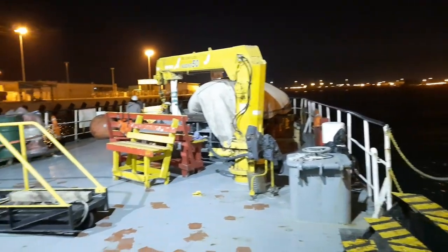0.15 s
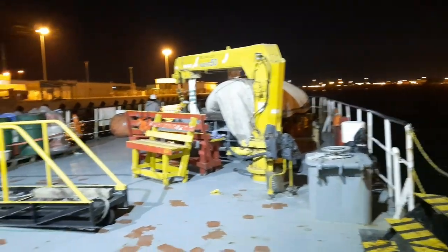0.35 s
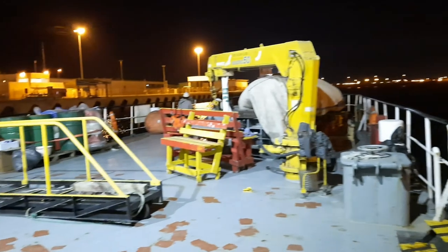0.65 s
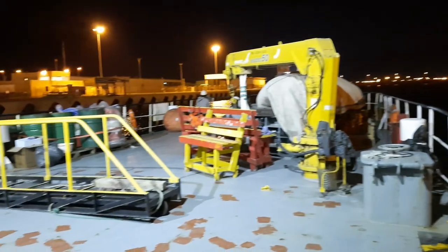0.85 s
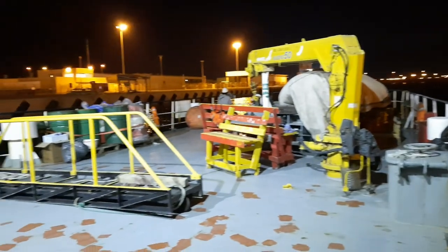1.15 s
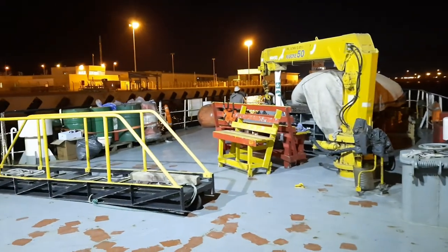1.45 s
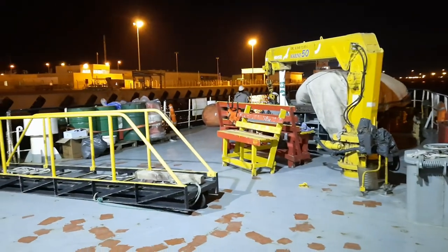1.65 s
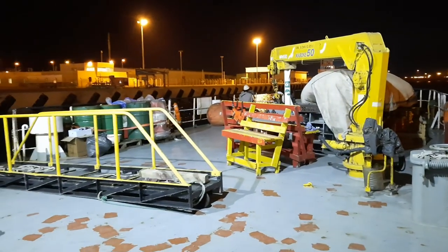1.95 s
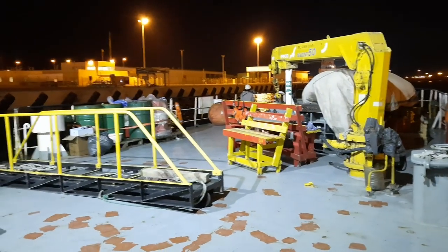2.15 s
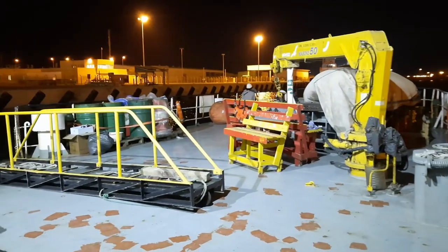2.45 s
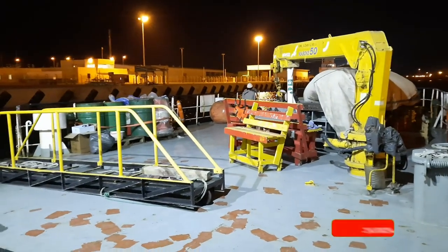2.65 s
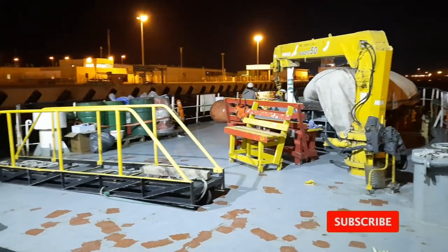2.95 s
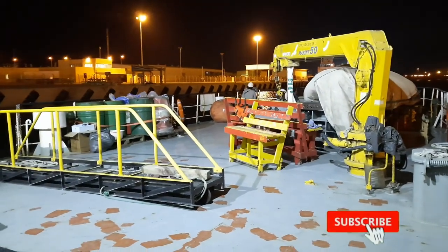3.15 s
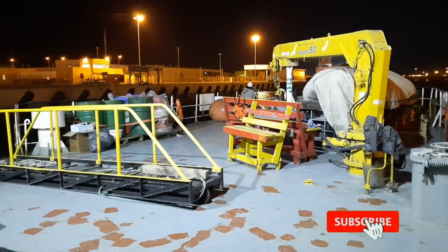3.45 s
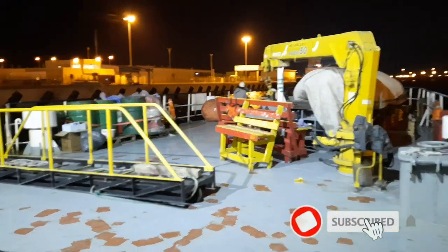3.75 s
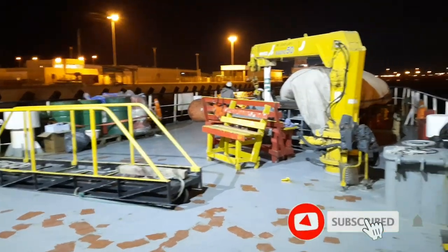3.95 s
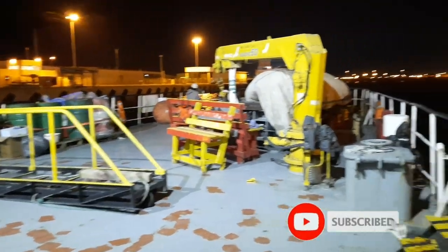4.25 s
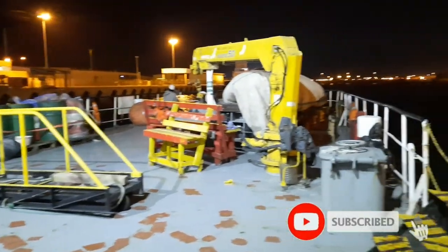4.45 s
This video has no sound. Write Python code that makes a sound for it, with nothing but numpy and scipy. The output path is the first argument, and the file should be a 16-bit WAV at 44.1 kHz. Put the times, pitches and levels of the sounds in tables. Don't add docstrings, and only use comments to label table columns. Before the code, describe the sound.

Steady machinery drone heard outdoors through a hand-held stereo device: a deep, slowly beating engine note, mid-low exhaust roar with fluttering firings, and a low fan hum. Over it lie thin motor whines and a soft rush of air with whistly pulses. After a brief opening puff the bed stays unbroken, growing slightly louder and airier towards the end, then cuts off.

```python
import sys
import numpy as np
from scipy import signal
from scipy.fft import rfft, irfft, next_fast_len
from scipy.io import wavfile
from scipy.ndimage import uniform_filter1d, map_coordinates

SR = 44100
rng = np.random.default_rng(int(sys.argv[2]) if len(sys.argv) > 2 else 0)


def store_pcm(level_fs):
    pcm = np.round(np.clip(level_fs, -1, 1) * 32767).astype(np.int16)
    wavfile.write(sys.argv[1], SR, np.atleast_2d(pcm).T)


def gain_from_db(level_db):
    decades = np.asarray(level_db, float) / 20
    return 10 ** decades


N = 203036
T = np.arange(N) / SR
SIDES = np.array([[.5], [-.5]])
DUCK_DB = -6

# t/s, level/dB over mean
LOAD = [(0, -3), (.05, 2), (.13, -1.5), (.3, -2.5), (.6, -2), (1.0, -3), (1.3, -1), (1.8, -2), (2.2, 0),
        (2.45, -3), (2.75, -1.5), (3.2, 0.5), (3.9, -1), (4.4, -0.5), (4.6, 1)]


def exhaust():
    load_db, = curves(LOAD)
    chug = wobble(13)
    knock_db = uniform_filter1d(knocks(), size=90)
    gas = funnel(load_db, chug) + silencer(load_db, chug, knock_db) + casing(load_db, knock_db)
    return gas + casing_rings() + low_note()


# f/Hz, level/dB per Hz
FUNNEL_SPECTRUM = [(8, -21), (25, -21.5), (38, -13.5), (50, -4.5), (62, 0), (75, -4), (105, -5), (135, 2),
                   (160, -1.5), (195, -2), (240, -26), (300, -120)]
# t/s, level/dB, f/Hz, half length/s
THUDS = [(0.052, -20, 92, 0.005), (0.12, -22, 117, 0.004), (0.215, -19, 112, 0.005),
         (0.261, -20, 127, 0.005), (0.522, -15, 105, 0.005), (0.601, -22, 91, 0.012),
         (0.699, -22, 92, 0.006), (0.846, -21, 110, 0.005), (1.018, -18, 89, 0.007),
         (1.097, -21, 100, 0.004), (1.206, -20, 88, 0.007), (1.394, -17, 119, 0.005),
         (1.488, -20, 107, 0.004), (1.586, -18, 91, 0.005), (1.671, -19, 101, 0.004),
         (1.718, -22, 109, 0.003), (1.779, -17, 101, 0.006), (1.856, -19, 100, 0.005),
         (1.947, -18, 99, 0.004), (2.002, -17, 102, 0.005), (2.114, -18, 98, 0.005),
         (2.258, -20, 104, 0.004), (2.361, -20, 92, 0.005), (2.475, -20, 100, 0.005),
         (2.586, -19, 104, 0.005), (2.683, -19, 105, 0.005), (2.786, -22, 86, 0.006),
         (2.9, -21, 102, 0.005), (3.027, -19, 93, 0.008), (3.089, -19, 98, 0.005), (3.175, -18, 91, 0.007),
         (3.248, -22, 105, 0.004), (3.298, -17, 105, 0.005), (3.358, -19, 108, 0.004),
         (3.409, -22, 93, 0.007), (3.557, -20, 100, 0.005), (3.767, -19, 95, 0.006),
         (3.835, -19, 95, 0.006), (3.912, -19, 111, 0.006), (3.973, -19, 100, 0.006),
         (4.034, -20, 100, 0.005), (4.089, -21, 115, 0.005), (4.152, -21, 81, 0.009),
         (4.225, -22, 117, 0.005), (4.374, -22, 85, 0.011), (4.477, -22, 91, 0.004),
         (4.53, -20, 113, 0.005), (4.592, -17, 93, 0.005)]
# t/s, level/dB, f/Hz, half length/s
GRUNTS = [(0.111, -23, 142, 0.01), (0.268, -26, 152, 0.012), (0.521, -22, 147, 0.007),
          (1.26, -24.5, 142, 0.0074), (1.393, -31, 137.5, 0.01), (1.671, -30, 140, 0.0052),
          (1.813, -20.5, 138, 0.0055), (1.985, -26, 142, 0.018), (2.114, -25, 143, 0.009),
          (2.248, -28.5, 146, 0.0077), (2.587, -26, 144, 0.0046), (3.355, -20, 150, 0.007),
          (3.672, -21.5, 145, 0.0083), (4.583, -19, 143, 0.006)]


def funnel(load_db, chug):
    level_db = -25 + 0.093 * load_db + 0.47 * chug + 1.1 * wobble(32)
    level_db += ducked(THUDS) + .5 * ducked(GRUNTS)
    gas = gain_from_db(level_db) * rush(shaped(FUNNEL_SPECTRUM), patchy_db=-0.16)
    return gas + bursts(THUDS, share_db=-1) + bursts(GRUNTS, share_db=-1)


# f/Hz, level/dB per Hz
SILENCER_SPECTRUM = [(150, -120), (190, -16), (225, -10), (270, -5), (305, -2), (345, -8), (390, -5),
                     (440, -7), (500, -7), (550, -10), (600, -25.5), (750, -120)]
# t/s, level/dB, f/Hz, half length/s
BOOMS = [(0.046, -11.5, 330, 0.0038), (0.277, -18, 312, 0.0049), (0.43, -17.5, 330, 0.0044),
         (0.565, -15, 317, 0.0036), (0.673, -16.5, 315, 0.0062), (0.752, -19.5, 302, 0.0061),
         (0.832, -19, 337, 0.0084), (1.055, -18, 347, 0.013), (1.157, -18, 327, 0.0088),
         (1.228, -19, 340, 0.0032), (1.28, -16, 354, 0.0058), (1.378, -18.5, 329, 0.007),
         (1.488, -15, 318, 0.0032), (1.545, -18.5, 330, 0.004), (1.595, -16, 336, 0.0037),
         (1.824, -11.5, 322, 0.0016), (1.903, -19, 313, 0.0051), (1.97, -20, 327, 0.0033),
         (2.098, -24, 326, 0.02), (2.232, -14, 306, 0.0051), (2.314, -22, 325, 0.0039),
         (2.463, -20, 309, 0.009), (2.621, -18, 370, 0.0064), (2.74, -15, 362, 0.0035),
         (2.971, -23, 338, 0.014), (3.056, -16.5, 341, 0.0032), (3.132, -22, 311, 0.0092),
         (3.2, -18.5, 320, 0.013), (3.266, -19, 336, 0.0055), (3.347, -18, 358, 0.0031),
         (3.405, -19, 350, 0.004), (3.47, -22, 305, 0.011), (3.526, -19, 294, 0.0076),
         (3.6, -18.5, 333, 0.0046), (3.671, -21.5, 301, 0.0088), (3.781, -15.5, 318, 0.006),
         (3.94, -19, 307, 0.017), (4.034, -29, 330, 0.015), (4.155, -18.5, 350, 0.0067),
         (4.212, -15, 330, 0.0027), (4.288, -23.5, 368, 0.008), (4.35, -22, 320, 0.0044),
         (4.418, -16.5, 320, 0.0075), (4.506, -29, 336, 0.0035), (4.563, -16.5, 335, 0.0046)]
# t/s, level/dB, f/Hz, half length/s
PINGS = [(0.059, -22, 499, 0.004), (0.139, -24, 487, 0.004), (0.434, -23, 499, 0.009),
         (0.548, -22, 500, 0.005), (0.695, -23, 471, 0.004), (0.845, -21, 485, 0.004),
         (1.161, -22, 460, 0.005), (1.253, -23, 481, 0.005), (1.377, -23, 459, 0.01),
         (1.505, -23, 498, 0.006), (1.651, -23, 476, 0.004), (1.735, -22, 494, 0.004),
         (1.792, -23, 471, 0.004), (1.877, -24, 506, 0.005), (2.076, -20, 492, 0.004),
         (2.226, -22, 477, 0.014), (2.289, -23, 478, 0.007), (2.467, -23, 498, 0.009),
         (2.557, -23, 496, 0.005), (2.666, -22, 483, 0.005), (2.752, -22, 479, 0.01),
         (2.985, -23, 496, 0.004), (3.053, -22, 469, 0.007), (3.185, -21, 465, 0.005),
         (3.421, -23, 483, 0.007), (3.619, -22, 464, 0.004), (3.716, -23, 471, 0.007),
         (3.791, -24, 465, 0.004), (3.843, -21, 483, 0.004), (3.92, -22, 496, 0.009),
         (4.076, -20, 475, 0.007), (4.282, -22, 481, 0.008), (4.341, -23, 479, 0.008),
         (4.398, -22, 472, 0.005), (4.487, -22, 492, 0.008), (4.537, -22, 492, 0.009)]


def silencer(load_db, chug, knock_db):
    level_db = -20.5 + load_db + 0.24 * wobble(24) + 0.81 * chug + knock_db
    level_db += ducked(BOOMS) + .5 * ducked(PINGS)
    gas = gain_from_db(level_db) * rush(shaped(SILENCER_SPECTRUM), patchy_db=0.18)
    return gas + bursts(BOOMS, share_db=-2) + bursts(PINGS, share_db=-2)


# f/Hz, level/dB per Hz
CASING_SPECTRUM = [(450, -120), (540, -5.5), (600, -1.5), (700, -2), (830, -1.5), (930, -7), (1000, -11.5),
                   (1150, -13.5), (1300, -15), (1450, -30), (1700, -120)]


def casing(load_db, knock_db):
    level_db = -30 + 0.88 * load_db + 1.1 * wobble(20) + knock_db
    return gain_from_db(level_db) * rush(shaped(CASING_SPECTRUM), patchy_db=1.0)


# t/s, level/dB over steady noise
KNOCKS = [(0.229, 7), (0.425, 8), (.841, 6), (1.054, 6), (1.137, 8), (1.277, 8), (1.381, 5), (1.632, 8),
          (2.012, 7), (2.341, 8), (2.451, 6), (3.511, 8), (4.027, 7), (4.126, 6)]


def knocks():
    dip_s, fade_s = .006, .012
    level_db = np.zeros(N)
    for s, db in KNOCKS:
        gap_s = abs(T - s)
        level_db += db * np.where(T < s, -np.exp(-gap_s / dip_s), np.exp(-gap_s / fade_s))
    return level_db


def casing_rings():
    ring_hz, ring_db, t60_s = 560, -30, .05
    out, t = np.zeros(N + SR), np.arange(SR // 10) / SR
    for s, db in KNOCKS:
        ring = gain_from_db(db + ring_db - 60 * t / t60_s) * np.sin(2 * np.pi * ring_hz * t)
        out[round(s * SR):][:len(t)] += ring
    return out[:N]


# t/s, level/dB over trough, half length/s
BEATS = [
    (0, 5.1, 0.091),
    (.56, 7.8, 0.025),
    (1.15, 13, 0.17),
    (1.9, 14, 0.17),
    (2.57, 9.3, 0.15),
    (3.13, 15, 0.12),
    (3.78, 6, 0.089),
    (4.05, 15.5, 0.16),
    (4.6, 14, 0.12),
]


def low_note():
    note_hz = 88.5 + 1.24 * wobble(4.94)
    level_db = -40 + ducked(THUDS) + swells(BEATS) + 4 * wobble(18)
    return tone(note_hz, level_db, pan_db=-0.5, lead=.1)


# multiple, level/dB, left-right/dB, left lead/rad
BLADES = [(2, -32.5, 2.5, .6), (13, -64.5, 2, -.6), (14, -67, 0, 2), (15, -68, 1, 1.5), (18, -74, -1, -.5),
          (19, -71, 0, 2.3), (21, -75, 0, -.8)]
# t/s, level/dB over lull, half length/s
CARRY = [(.2, 2, 0.052), (.55, -2, .2), (.95, 4, 0.084), (1.15, 3, 0.17), (1.4, 3, 0.077), (1.62, 3, 0.022),
         (1.8, 5.5, 0.073), (2.08, 6, 0.097), (2.24, 9.5, 0.016), (2.34, -7.5, 0.067), (2.5, 3, 0.026),
         (2.73, -6.5, 0.085), (3.03, 4, 0.023), (3.23, 1, 0.017), (3.45, 8.5, 0.047), (3.65, 5.5, 0.07),
         (3.88, 5, 0.062), (4.06, 7, 0.028), (4.29, 5.5, 0.04), (4.44, 4.5, 0.029), (4.6, -8, 0.043)]
# t/s, level/dB, half length/s
SECOND = [
    (.2, 0, 0.069),
    (1.3, -0.5, 0.28),
    (1.72, -9.5, 0.047),
    (1.9, 6.5, 0.066),
    (2.35, 4, 0.093),
    (2.9, -4, 0.062),
    (3.22, -7, 0.05),
    (3.5, 1, .2),
    (4.3, 4.5, .08),
]


def fan():
    blade_hz = 177.7 + 0.034 * wobble(1.8)
    blade_db = -29 + swells(CARRY) + 2.2 * wobble(24)
    out = tone(blade_hz + 1.2 * wobble(30), blade_db, pan_db=0.5, lead=.12)
    siren_db = -59.5 + 0.77 * T + .3 * wobble(1.6) + 2.0 * wobble(14)
    siren_db += swells([(.1, -3.5, .3)])
    out += tone(17 * blade_hz + 1.5 * wobble(25), siren_db, pan_db=2.5, lead=-.9)
    second_db = swells(SECOND)
    for multiple, db, pan_db, lead in BLADES:
        level_db = db + (multiple < 3) * second_db + 3.5 * wobble(23.9)
        out += tone(multiple * blade_hz + 2.92 * wobble(30.06), level_db, pan_db, lead)
    return out


# f/Hz, level/dB, wander/Hz, left-right/dB, left lead/rad
WHINES = [(1188.4, -54.5, .8, 3, .6), (1441, -63, 2.5, 1, -2.2), (1424, -57, 2.5, 0, -2.4),
          (798, -48, 4, 1, .3), (950.7, -54, .8, 0, 2.6), (1931.2, -55, .5, 0, -2.8),
          (1961, -60, .8, 0, -2.7), (2130, -62, 4, 0, -2.2)]


def pumps():
    out = tone(468.5 + 0.65 * wobble(3.92), -36.5 + 2.97 * wobble(16), pan_db=-1.0, lead=0.27)
    for whine_hz, db, wander_hz, pan_db, lead in WHINES:
        out += tone(whine_hz + wander_hz * wobble(3.3), db + 4.0 * wobble(7.3), pan_db, lead)
    return out


# t/s, half length/s, f/Hz,
# level/dB, left lead/rad
SQUEALS = [
    (2.93, .19, 1443, -50, -1.6),
    (1.35, .38, 2843.5, -58, 1.6),
    (3.5, .45, 2843.5, -62, 1.6),
    (3.8, .1, 1425, -54, -1.6),
    (4.45, .12, 1480, -55, -1.6),
]


def squeals():
    out = np.zeros((2, N))
    for s, half_s, hz, db, lead in SQUEALS:
        shape = np.exp(-.5 * ((T - s) / half_s) ** 4)
        out += shape * tone(hz + 2.6 * wobble(7.1), db + 1.9 * wobble(10), 0.68, lead)
    return out


# t/s, level/dB over steady draught
STROKES = [(.05, 7), (.4, 7), (.62, 8), (.85, 4), (1.02, 5), (1.2, 4), (1.42, 4), (1.64, 10), (2.0, 6),
           (2.37, 9), (2.76, 3), (3.1, 5), (3.45, 6), (3.83, 13), (4.13, 8), (4.4, 8), (4.54, 13)]


def vent():
    push_db = swells(STROKES, half_s=0.057)
    return draught(push_db) + whistle(push_db) + grille() + puff()


# f/Hz, level/dB per Hz
RUSH = [(1100, -120), (1250, -21.5), (1400, 1.5), (1700, 3.5), (1850, -2), (2250, -5.5), (2520, -10.5),
        (2800, -10), (3150, -14), (3650, -12), (4000, -16.5), (4600, -24), (5500, -121)]
# f/Hz, level/dB per Hz
HISS = [(3400, -121), (4000, -11), (4500, 0.5), (5300, -1.5), (6000, -2), (7500, -7), (8600, -13.5),
        (9400, -21.5), (10200, -19), (11000, -17.5), (12000, -19.5), (12900, -18.5), (14300, -22.5),
        (15100, -33), (15600, -121)]


def draught(push_db):
    gust, draught_db = wobble(9.9), .5 * T
    rush_db = -41.5 + draught_db + 0.099 * push_db + 0.12 * gust
    hiss_db = -57.5 + draught_db + 0.11 * push_db + 0.69 * gust
    air = gain_from_db(rush_db) * rush(shaped(RUSH), patchy_db=1.65)
    return air + gain_from_db(hiss_db) * rush(shaped(HISS), patchy_db=-1.5)


# t/s, level/dB, f/Hz, half length/s
CHIRPS = [(0.047, -43, 1616, 0.008), (0.14, -44, 1608, 0.005), (0.386, -41, 1646, 0.007),
          (0.471, -43, 1639, 0.005), (0.573, -45, 1632, 0.006), (0.624, -38, 1640, 0.005),
          (0.761, -47, 1634, 0.008), (0.831, -43, 1602, 0.005), (1.017, -43, 1636, 0.007),
          (1.099, -46, 1665, 0.005), (1.201, -45, 1623, 0.007), (1.299, -47, 1638, 0.005),
          (1.408, -42, 1608, 0.005), (1.474, -45, 1618, 0.006), (1.562, -43, 1620, 0.005),
          (1.654, -41, 1613, 0.005), (1.87, -46, 1625, 0.004), (1.962, -43, 1583, 0.011),
          (2.053, -45, 1632, 0.005), (2.104, -46, 1613, 0.006), (2.226, -45, 1606, 0.004),
          (2.299, -44, 1632, 0.01), (2.358, -41, 1642, 0.005), (2.415, -42, 1615, 0.005),
          (2.527, -45, 1626, 0.005), (2.73, -43, 1644, 0.005), (2.796, -45, 1651, 0.007),
          (3.087, -43, 1634, 0.005), (3.162, -44, 1631, 0.005), (3.25, -46, 1604, 0.005),
          (3.351, -44, 1611, 0.006), (3.454, -42, 1639, 0.005), (3.767, -42, 1612, 0.004),
          (3.844, -40, 1620, 0.007), (3.911, -44, 1627, 0.005), (3.97, -46, 1618, 0.005),
          (4.071, -42, 1620, 0.005), (4.122, -40, 1620, 0.008), (4.191, -44, 1617, 0.007),
          (4.258, -45, 1616, 0.011), (4.35, -43, 1624, 0.006), (4.404, -45, 1666, 0.006),
          (4.466, -39, 1620, 0.008), (4.543, -39, 1641, 0.009), (4.597, -46, 1651, 0.004)]


def whistle(push_db):
    level_db = -49 + 0.45 * ducked(CHIRPS) + 0.75 * push_db + 0.98 * wobble(35)
    breath = gain_from_db(level_db) * rush(resonance(centre_hz=1630, width_hz=210), patchy_db=0.5)
    return breath + bursts(CHIRPS, share_db=-.5)


# t/s, level/dB over lull, half length/s
GUSTS = [
    (.42, 5, 0.06),
    (1.28, 5, .09),
    (1.6, 7, .1),
    (1.95, 5, 0.1),
    (2.25, 5, 0.12),
    (2.98, 6, 0.12),
    (3.5, 6, 0.12),
    (3.9, 7, 0.18),
]


def grille():
    return gain_from_db(-56 + swells(GUSTS)) * rush(resonance(centre_hz=2540, width_hz=420), patchy_db=3.0)


# f/Hz, level/dB per Hz
PUFF_SPECTRUM = [(1500, -121), (2500, 1), (5000, 3.5), (8300, -1.5), (9500, -19), (10600, -12),
                 (14000, -13.5), (15500, -18), (15700, -121)]


def puff():
    end_s, release_s, sag_db_per_s = .158, .008, 30
    gate = (1 - np.tanh((T - end_s) / release_s)) / 2
    return gain_from_db(-47 - sag_db_per_s * T) * gate * rush(shaped(PUFF_SPECTRUM), patchy_db=.8)


# f/Hz, likeness/0-1
ALIKE = [(25, .25), (60, .66), (110, .68), (250, .7), (500, .77), (800, .55), (1280, .15), (1600, .55),
         (1950, .65), (2400, .48), (3150, .1), (3700, .45), (4150, .12), (4800, .3), (6000, .12)]
# f/Hz, left lead/rad
LEAD = [(30, 0), (600, .35), (1200, .5), (1400, -2.7), (1700, -3.3), (2050, -3), (2350, -1.2), (3000, -.9),
        (3350, -1.5), (4000, -.2), (4400, 1.5), (5000, 3.1), (6000, 4.8)]
# f/Hz, left-right/dB
BALANCE_DB = [(60, -.4), (300, 1), (600, 1), (2000, 0), (6000, -1), (8000, -1), (8600, -5.5), (9800, 0),
              (11500, -.5), (13500, -6), (15000, -3)]


def rush(gain, patchy_db):
    z = signal.stft(rng.standard_normal((3, N + 1024)), nperseg=512)[2]
    field = uniform_filter1d(rng.standard_normal(z.shape[1:]), size=5, axis=0)
    field = uniform_filter1d(field, size=10, axis=1)
    noise = signal.istft(z * gain_from_db(patchy_db * unit(field)), nperseg=512)[1]
    m = next_fast_len(N + 8192)
    shared, *own = rfft(noise, m)
    hz = np.fft.rfftfreq(m, 1 / SR)
    alike = np.clip(along(ALIKE, hz), 0, 1)
    pair = np.sqrt(alike) * shared * np.exp(1j * SIDES * along(LEAD, hz))
    pair = pair + np.sqrt(1 - alike) * np.array(own)
    return unit(irfft(pair * gain(hz) * gain_from_db(SIDES * along(BALANCE_DB, hz)), m)[:, :N])


def bursts(rows, share_db):
    out = np.zeros((2, N + SR))
    side = np.sign(rng.standard_normal(len(rows)))
    t = np.arange(-SR // 5, SR // 5) / SR
    for (s, db, hz, half_s), turn in zip(rows, side):
        lead = along(LEAD, hz) + turn * np.arccos(along(ALIKE, hz))
        lead = np.clip(np.angle(np.exp(1j * lead)), -2.2, 2.2)
        size = np.sqrt(2) * gain_from_db(db + share_db + SIDES * along(BALANCE_DB, hz)) / np.cos(lead / 2)
        ring = np.exp(-(t / (2 * half_s)) ** 2) * np.cos(2 * np.pi * hz * t + SIDES * lead)
        out[:, round(s * SR):][:, :len(t)] += size * ring
    return out[:, SR // 5:][:, :N]


def tone(hz, db, pan_db, lead):
    turn = 2 * np.pi * (np.cumsum(hz) / SR + rng.random())
    return np.sqrt(2) * gain_from_db(db + SIDES * pan_db) * np.sin(turn + SIDES * lead)


def shaped(spectrum):
    return lambda hz: gain_from_db(along(spectrum, hz))


def resonance(centre_hz, width_hz):
    return lambda f: np.abs(f * width_hz / (centre_hz ** 2 - f * f + 1j * f * width_hz)) ** 2


def swells(rows, half_s=None):
    return sum(row[1] * np.exp(-.5 * ((T - row[0]) / (half_s or row[2])) ** 2) for row in rows)


def ducked(rows):
    return swells([(s, DUCK_DB, 1.5 * half_s) for s, db, hz, half_s in rows])


def wobble(rate):
    knots = rng.standard_normal(int(N * rate / SR) + 4)
    return map_coordinates(knots, [np.arange(N) * rate / SR])


def curves(rows):
    s, *cols = np.transpose(rows)
    return [np.interp(T, s, c) for c in cols]


def along(points, hz):
    f, v = np.transpose(points)
    return np.interp(np.log(hz + 1), np.log(f + 1), v)


def unit(x):
    return x / np.sqrt(np.mean(x ** 2) + 1e-20)


# t/s, left-right/dB, extra left lead/us
TURN = [
    (0, -.9, -55),
    (.35, -.7, -65),
    (.8, -.3, -45),
    (1.2, .3, 0),
    (1.5, .3, 15),
    (2.2, .2, 5),
    (2.7, -.3, -5),
    (3.6, .3, -10),
    (4.1, .4, -20),
    (4.6, .4, -45),
]


def turned(x, share):
    pan_db, lead_us = curves(TURN)
    at = np.arange(N) + SIDES * share * lead_us * SR / 1e6
    ports = [map_coordinates(port, [i], order=5, mode="mirror") for port, i in zip(x, at)]
    return gain_from_db(SIDES * pan_db) * np.array(ports)


# t/s, level/dB, half length/s
LULLS = [(.155, -1, 0.019), (.243, -4.5, 0.007), (.315, -3.5, .01), (.72, -4, 0.0056), (.975, -8.5, 0.0077),
         (1.135, -5.5, 0.0059), (1.64, -3, 0.018), (2.06, -8, 0.0038), (2.2, -2.5, 0.0096),
         (2.64, -6.5, 0.0062), (2.72, -8, 0.0034), (2.88, -3.5, 0.01), (3.0, 0, 0.0078),
         (3.32, -1.5, 0.0059), (3.57, -1.5, 0.009), (4.38, -3.5, 0.012), (4.54, 0.5, 0.0062)]


def scene():
    lull = gain_from_db(swells(LULLS))
    near = lull * exhaust() + pumps() + squeals() + vent()
    return turned(near, share=1) + turned(lull * fan(), share=-.8)


def top_cut(x):
    return signal.sosfilt(signal.butter(12, 15700, fs=SR, output="sos"), x)


def record(dry):
    fade_s = .003
    ease = np.clip((N - np.arange(N)) / (fade_s * SR), 0, 1)
    mix = dry * np.sin(ease * np.pi / 2) ** 2
    return top_cut(mix)


dry = scene()
out = record(dry)
store_pcm(out)
```